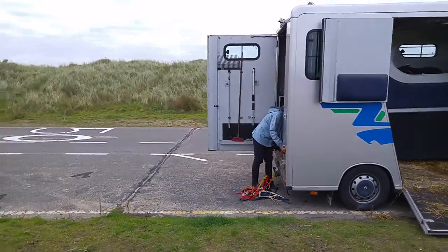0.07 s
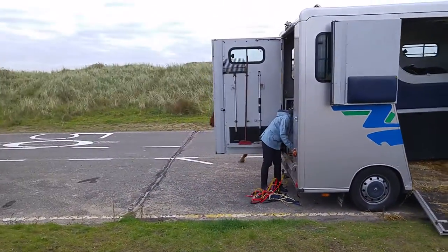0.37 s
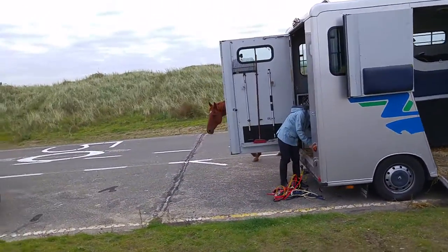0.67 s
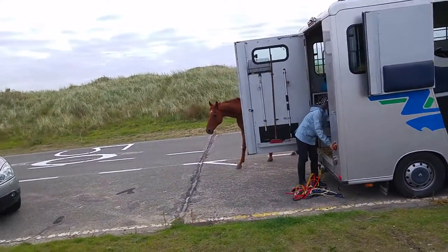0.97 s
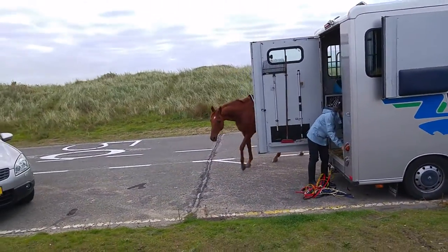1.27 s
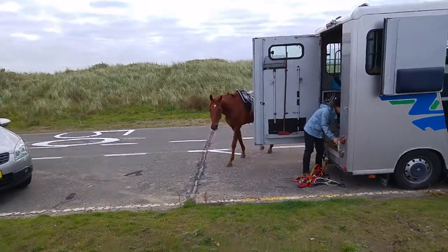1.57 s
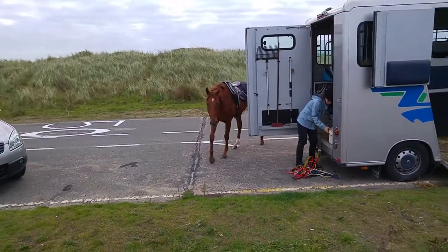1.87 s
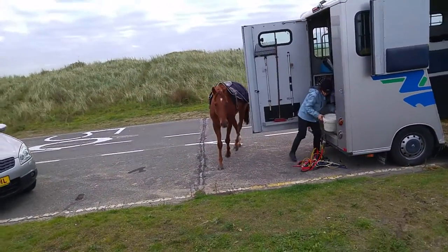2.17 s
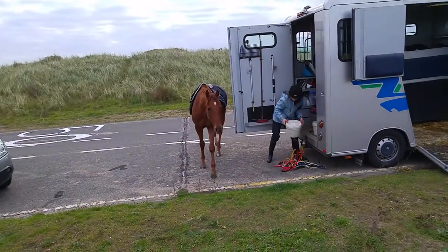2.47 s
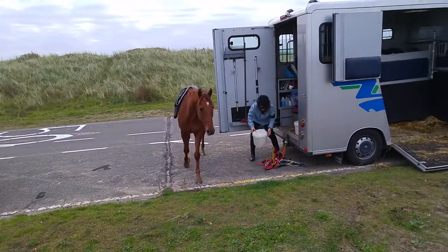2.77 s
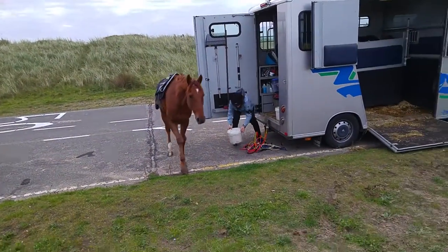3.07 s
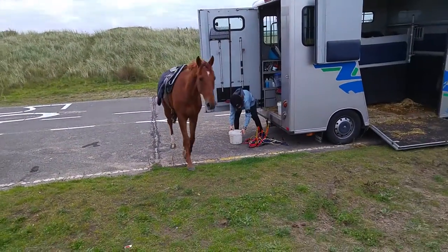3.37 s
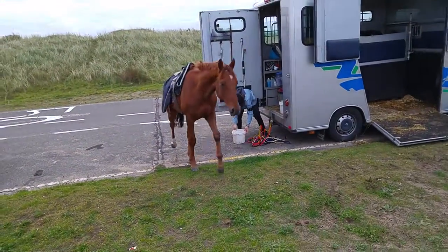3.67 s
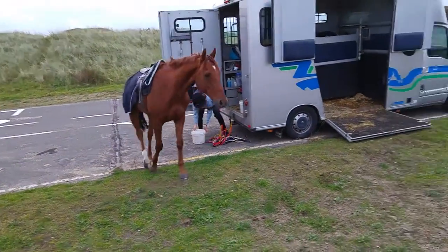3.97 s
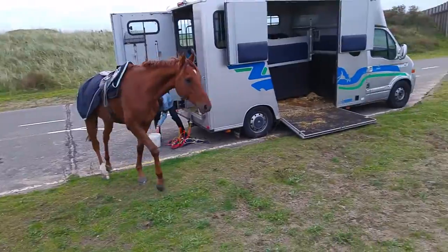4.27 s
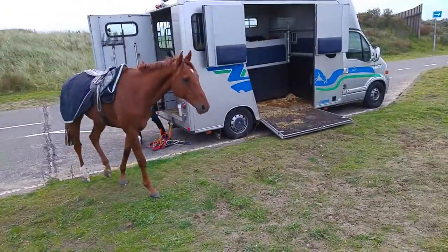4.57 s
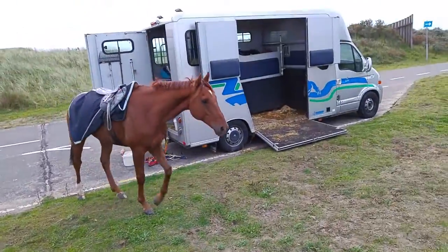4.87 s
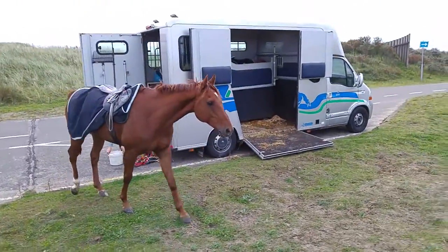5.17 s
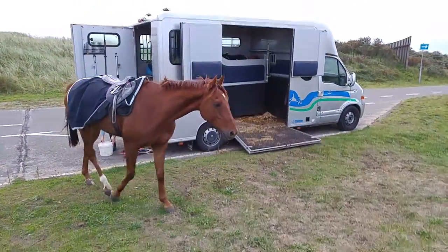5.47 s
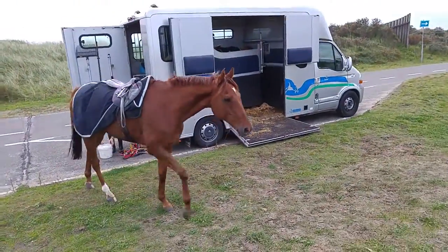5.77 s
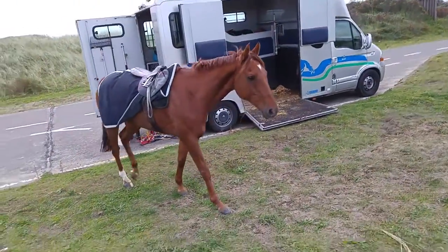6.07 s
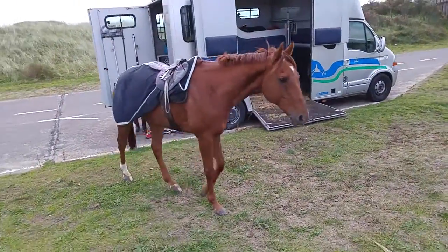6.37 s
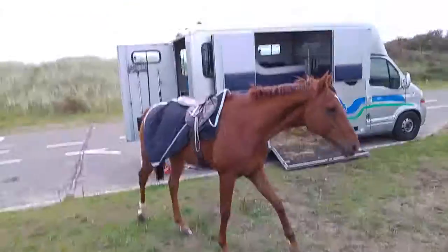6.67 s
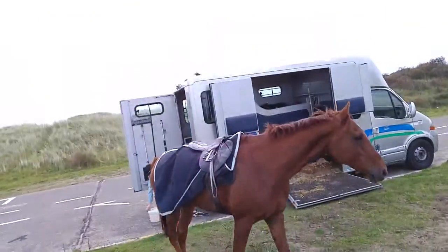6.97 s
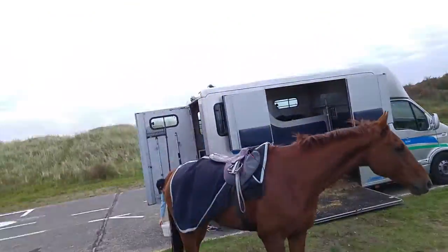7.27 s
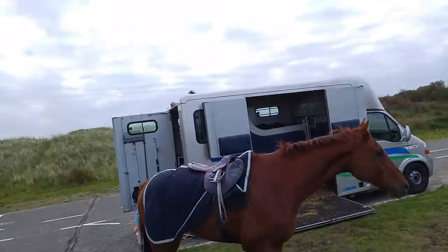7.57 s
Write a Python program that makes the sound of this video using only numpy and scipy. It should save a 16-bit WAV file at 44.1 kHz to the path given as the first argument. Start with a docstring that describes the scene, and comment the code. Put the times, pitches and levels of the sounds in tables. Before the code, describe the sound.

A horse walks on asphalt close by, outdoors, over a faint wash of distant air. From about 0.2 seconds its shod hooves land in uneven, hollow clops, often two or three quick knocks together, with gritty scuffs and a slight echo. They are strongest between 1 and 3 seconds, while light puffs of wind touch the microphone on the right. At about 3.4 seconds a plastic bucket is set down with a hollow thump. The clops stop near 3.7 seconds as the horse reaches grass, except for one sharp clinking step at 4.8. From 4 seconds loud gusts buffet the microphone with a sputtering rumble, mostly on the right, then shifting toward the left from about 6.5. The wind pops sharply at 5.6 and 6.6 seconds. Beneath it, faint swishes of dry grass and cloth and a few tiny snaps continue until the end, around 7.6 seconds.

```python
"""Horse passing in a gusty wind

A horse walks over asphalt, past a parked horse van and onto grass, close to a hand-held stereo mic.
Each hoof lands in a few quick knocks, scuffs the grit and echoes off the van; a bucket is set down.
Dry grass hisses over a distant wash of air, and gusts buffet first the right mic port, then the left."""
import sys
import numpy as np
from scipy import signal
from scipy.fft import rfft, irfft
from scipy.io import wavfile
from scipy.ndimage import uniform_filter1d

SR = 44100
rng = np.random.default_rng(int(sys.argv[2]) if len(sys.argv) > 2 else 0)


def output_pcm(signal):
    """Save a mono or channel-first signal as 16-bit PCM at the path in sys.argv[1].

    Samples are clipped to [-1, 1] before scaling.
    """
    pcm = np.clip(np.atleast_2d(signal).T, -1, 1) * 32767
    wavfile.write(sys.argv[1], SR, np.round(pcm).astype(np.int16))


N = 336483
TIME = np.arange(N) / SR

# spectrum of road grit under a shoe: (frequency [Hz], level [dB])
GRIT_SPECTRUM = [(400, 11), (2400, 1.5), (3500, -7.5), (7200, 9.5), (10000, -8.5), (16000, -12)]
# colour of wind striking a mic port: (frequency [Hz], gain [dB])
BUFFET_SPECTRUM = [(45, -2), (70, 5), (130, -2.5), (310, 0), (400, 3), (490, -21), (590, 5), (1000, -4.5),
                   (3000, -21)]


def hooves():
    """Hooves on asphalt, close by: the rim mostly cracks, the flat sole rings."""
    # contacts, one to four a footfall: (time [s], ring level [dB], sole pitch [Hz], crack level [dB])
    contacts = [(0.225, -32.5, 950, -43), (0.543, -26.5, 990, -34), (0.8193, -26, 970, -30.5),
                (0.826, -20.5, 1027, -40), (1.086, -26, 1385, -31), (1.091, -29, 760, -42),
                (1.1113, -13, 1030, -23), (1.2262, -23, 1013, -35.5), (1.367, -34, 780, -38.5),
                (1.376, -36, 1050, -33), (1.3947, -38, 1050, -43.5), (1.4124, -39, 1050, -31),
                (1.639, -24, 956, -41), (1.6748, -24, 958, -32.5), (1.827, -25.5, 1004, -36.5),
                (1.944, -33, 1010, -37), (1.9587, -18.5, 1012, -20.5), (2.077, -14, 1120, -21.5),
                (2.0836, -18, 1040, -30), (2.2006, -21.5, 750, -23.5), (2.2189, -21, 1010, -21.5),
                (2.236, -26.5, 1065, -34.5), (2.446, -24.5, 1120, -29.5), (2.4655, -22, 990, -33),
                (2.765, -17, 1014, -27.5), (2.773, -17.5, 1260, -25), (3.065, -23, 1017, -31),
                (3.072, -22, 1060, -21.5), (3.08, -15.5, 1027, -31), (3.4765, -21, 725, -31),
                (3.651, -29, 1196, -34.5), (3.661, -15, 930, -37.5), (4.8425, -13.5, 806, -31)]
    out = np.zeros((2, N))
    for start, ring_db, hz, crack_db in contacts:
        add(out, start, knock(ring_db, hz, crack_db))
    # a shoe caught on its edge rings one clear note
    add(out, 0.543, ring([(2605, -32, 0.027)], TIME[:SR // 10]))
    return out


def knock(ring_db, sole_hz, crack_db, close_s=0.00086, lag_samples=6):
    """A knock cracks on grit and rings the steel shoe; the hollow under the sole swells as it closes."""
    # modes of the hollow: (ratio to sole pitch, level [dB], t60 [s])
    sole_modes = [(0.86, -8, 0.036), (0.998, 2.5, 0.021), (1.017, -14.5, 0.06)]
    # modes of the shoe: (frequency [Hz], level relative to the crack [dB], t60 [s])
    shoe_modes = [(2286, -9, 0.024), (2627, -5.5, 0.02), (4250, -24.5, 0.06)]
    # spectrum of struck asphalt: (frequency [Hz], level [dB])
    road_spectrum = [(200, -9.5), (500, 2), (1200, 10.5), (1700, -0.5), (2500, 3), (3300, -10.5),
                     (4500, -6), (5500, -5.5), (7200, -1), (10000, -14.5), (16000, -25.5)]
    t = TIME[:4096]
    hollow = ring([(sole_hz * ratio, db, t60) for ratio, db, t60 in sole_modes], t)
    hollow *= 1 - np.exp(-t / close_s)
    # the shoe's modes scatter in pitch and level from knock to knock
    shoe = ring([(hz * (1 + 0.035 * rng.standard_normal()), db + 2 * rng.standard_normal(), t60)
                 for hz, db, t60 in shoe_modes], t)
    left = gain_of(ring_db) * hollow + gain_of(crack_db) * shoe
    # the horse is slightly to the left, so the right port hears it later
    right = np.interp(t - lag_samples / SR, t, left, left=0)
    # every spot of road has its own colour
    spot = [(hz, db + 2 * rng.standard_normal()) for hz, db in road_spectrum]
    grit = crack(spot, decay_s=0.0067, crumble_db=-22.5, crumble_s=0.012)
    return np.array([left, right]) + gain_of(crack_db) * grit


def crack(spectrum, decay_s, crumble_db, crumble_s, click_height=4.9, size=4096):
    """A click and a sharp burst, then a short crumble; the ports share mainly the lows of its noise."""
    t = TIME[:size]
    bins = rfft(rng.standard_normal((2, size)))
    shared = 1 / (1 + (np.fft.rfftfreq(size, 1 / SR) / 2800) ** 4)
    bins[1] = shared * bins[0] + np.sqrt(1 - shared ** 2) * bins[1]
    burst = irfft(bins, size)
    burst[:, 0] += click_height  # first contact
    # grains of grit give way one after another
    grains = unit_rms(gain_of(1.9 * unit_rms(uniform_filter1d(rng.standard_normal(size), size=90))))
    fade = np.exp(-(t / decay_s) ** 2) + gain_of(crumble_db) * np.exp(-t / crumble_s) * grains
    return unit_rms(coloured(burst * fade, spectrum)) * np.sqrt(np.mean(fade ** 2))


def scuffs():
    """Hooves drag grit, brush turf and slide with a thin hiss; tack and dry stalks snap."""
    # grainy scrapes: (time [s], length [s], level [dB], left minus right [dB])
    scrapes = [(1.445, 0.19, -52.5, -6), (1.732, 0.034, -44.5, 0), (1.777, 0.019, -44.5, 5),
               (2.173, 0.014, -40, -6), (2.493, 0.042, -46.5, -12.5), (2.845, 0.037, -37, 3.5),
               (3.412, 0.094, -46, -10), (3.709, 0.021, -37, -3.5), (6.468, 0.059, -42.5, 13)]
    # hissing slides: (time [s], length [s], level [dB], pitch [Hz])
    slides = [(0.094, 0.026, -50.5, 3070), (0.593, 0.18, -54.5, 7300), (2.243, 0.071, -48, 6800),
              (6.24, 0.23, -43, 7350)]
    # spectrum of a slide: (ratio to its pitch, level [dB])
    slide_spectrum = [(0.61, -8.5), (0.74, 0.5), (0.85, -4), (1, 6), (1.2, -23)]
    # small sharp snaps: (time [s], level [dB], left minus right [dB])
    snaps = [(0.5038, -38.5, -1), (4.1519, -38.5, -4), (4.331, -39.5, -6), (6.724, -37, -18.5)]
    # spectrum of a snap: (frequency [Hz], level [dB])
    snap_spectrum = [(300, 9), (3000, -3), (7000, 9.5), (15000, -7.5)]
    out = np.zeros((2, N))
    grit = noise(GRIT_SPECTRUM) * gain_of(4.8 * flutter(rate_hz=2900))
    for start, length, db, pan_db in scrapes:
        out += gain_of(db) * panned(pan_db) * grit * arch(start, length)
    for start, length, db, hz in slides:
        hiss = noise([(hz * ratio, level) for ratio, level in slide_spectrum])
        out += gain_of(db) * hiss * arch(start, length)
    for start, db, pan_db in snaps:
        snap = crack(snap_spectrum, decay_s=0.0017, crumble_db=0.5, crumble_s=0.0054)
        add(out, start, gain_of(db) * panned(pan_db) * snap)
    return out


def shoe_clinks():
    """A shoe grazes, then clips the edge of the road: a gritty snap with a very short ring."""
    # a light and a hard strike: (time [s], level [dB])
    strikes = [(4.8192, -49), (4.8427, -28.5)]
    # modes of the clipped steel: (frequency [Hz], level [dB], t60 [s])
    steel_modes = [(3750, 5.5, 0.016), (4290, 2, 0.015)]
    out = np.zeros((2, N))
    for start, db in strikes:
        snap = crack(GRIT_SPECTRUM, decay_s=0.0016, crumble_db=-21, crumble_s=0.008)
        add(out, start, gain_of(db) * (snap + ring(steel_modes, TIME[:snap.shape[1]])))
    return out


def bucket(rise_s=0.0037):
    """A plastic bucket rocks onto its base with a hollow thump."""
    # the base touches down: (time [s], level [dB])
    hits = [(3.432, -23.5), (3.444, -17), (3.46, -19.5)]
    # modes of the bucket: (frequency [Hz], level [dB], t60 [s])
    modes = [(163, 1, 0.13), (292.6, 6, 0.14), (353, -5, 0.049), (462, -3.5, 0.11), (600, 9.5, 0.011)]
    out, t = np.zeros((2, N)), TIME[:12000]
    thump = ring(modes, t) * (1 - np.exp(-t / rise_s))
    for start, db in hits:
        add(out, start, gain_of(db) * thump)
    return out


def echoes(direct, size=12000):
    """The road and the van's side return a few early taps, then a thin outdoor tail."""
    # decay of the tail: (frequency [Hz], t60 [s])
    tail_t60 = [(300, 0.66), (1000, 0.3), (2500, 0.16), (7000, 0.047), (15000, 0.033)]
    t = TIME[:size]
    # sparse reflections: 2500 a second in the tail, 900 in the early part
    taps = rng.standard_normal((2, size)) * (rng.random((2, size)) < 2500 / SR) * (t > 0.004)
    hz, frame_s, bins = signal.stft(taps, SR, nperseg=256)
    decay = np.exp(-np.log(1000) * frame_s / curve_at(tail_t60, hz)[:, None])
    tail = signal.istft(bins * decay, SR, nperseg=256)[1][:, :size]
    early = rng.standard_normal((2, size)) * (rng.random(size) < 900 / SR) * (t > 0.002)
    early *= np.exp(-t / 0.017)
    response = (gain_of(-29.0) * unit_rms(tail) + gain_of(-6.5) * unit_rms(early)) / np.sqrt(size)
    return signal.fftconvolve(direct, response, axes=1)[:, :N]


def port_colour(sound):
    """The two mic ports colour nearby sounds in opposite ways."""
    # tilt between the ports: (frequency [Hz], gain added left and taken right [dB])
    tilt = [(200, -3), (850, 2.5), (1500, 0.5), (2400, -5), (3500, -3), (7000, 4.5), (12000, 1.5)]
    return np.array([coloured(sound[0], tilt), coloured(sound[1], [(hz, -db) for hz, db in tilt])])


def wind(port_limit=1.05):
    """Wind right on the mic: near its pressure limit a port saturates and crackles."""
    db, octaves = wind_pressure()
    left = port_buffeting(db[0], octaves[0], corner_hz=905)
    right = port_buffeting(db[1], octaves[1], corner_hz=557)
    return port_limit * np.tanh((np.array([left, right]) + thumps_and_pops()) / port_limit)


def wind_pressure(rise_s=0.012, fall_s=0.025):
    """Gusts rise, hold and fall over the breeze; gives each port's level [dB] and band shift [octaves]."""
    # breeze between gusts: (time [s], left level [dB], right level [dB])
    breeze = [(0, -52, -42), (.45, -61, -40), (.95, -73, -57), (1.6, -53, -47.5), (2.35, -60, -50),
              (3.1, -66, -39.5), (3.85, -49, -42.5), (4.5, -39, -33.5), (6.348, -32.5, -31),
              (7.2, -34, -43), (7.63, -24, -31.5)]
    # gusts: (time [s], hold [s], windward level [dB], left minus right [dB], band shift [octaves])
    gusts = [(0.121, 0.042, -33, -35, -0.65), (2.554, 0.029, -30, -32, -1.54),
             (2.976, 0.034, -27.5, -11, -0.44), (3.13, 0.032, -26, -24, -1.24),
             (4.117, 0.18, -17.5, -25, -0.58), (4.568, 0.35, -17.5, -22, -0.15),
             (4.801, 0.025, -17, -18, -0.023), (4.979, 0.034, -12.5, -34, -0.19),
             (5.095, 0.094, -14.5, -16, 0.021), (5.237, 0.042, -12.5, -28, 0.29),
             (5.337, 0.012, -14, -33, 0.06), (5.441, 0.0067, -15.5, -29, -0.56),
             (5.508, 0.0033, -23, 27, -0.27), (5.641, 0.011, -10, -23, 0.29), (5.703, 0.21, -19, -30, 0.25),
             (5.88, 0.024, -19, -24, 0.46), (5.955, 0.083, -13, -36, -0.0054),
             (6.101, 0.087, -15.5, -34, -0.42), (6.217, 0.036, -14, -34, -0.043),
             (6.411, 0.032, -16.5, -8.5, -0.33), (6.498, 0.068, -15, 2, 0.011),
             (6.564, 0.24, -15.5, 11.5, 0.22), (6.836, 0.24, -19, -8.5, -0.06),
             (6.888, 0.013, -15, -3, 0.5), (7.153, 0.0036, -14.5, -8.5, -0.65),
             (7.32, 0.092, -13, 25, -0.5), (7.374, 0.035, -14.5, 32, 0.33), (7.468, 0.02, -17.5, -1, -0.4)]
    times, *port_levels = np.transpose(breeze)
    power = gain_of([np.interp(TIME, times, db) for db in port_levels]) ** 2
    weighted_shift = np.zeros((2, N))
    for start, hold, db, pan_db, octaves in gusts:
        before, after = np.maximum(start - TIME, 0), np.maximum(TIME - start - hold, 0)
        swell = np.exp(-before / rise_s - after / fall_s)
        gust_power = (gain_of(db) * windward(pan_db) * swell) ** 2
        power += gust_power
        weighted_shift += octaves * gust_power
    return 10 * np.log10(power), weighted_shift / power


def port_buffeting(pressure_db, octaves, corner_hz, size=1024):
    """Eddies buffet one port; the stronger the gust, the smaller the eddies and the higher their band."""
    hz, frame_s, bins = signal.stft(rng.standard_normal(N), SR, nperseg=size, noverlap=size * 3 // 4)
    # the stream sputters within each gust: surges are capped, lulls go deeper
    sputter_db = 3.5 * np.minimum(flutter(rate_hz=50, slowest_hz=12)[0], 1.2)
    band_hz = corner_hz * 2 ** (octaves + (pressure_db + sputter_db + 13.0) / 16)
    ratio = hz[:, None] / np.interp(frame_s, TIME, band_hz)
    band = (ratio / np.hypot(ratio, 0.18)) ** 2.65 / (1 + ratio ** 2.224) ** 1.927
    shape = gain_of(curve_at(BUFFET_SPECTRUM, hz))[:, None] * band
    shape /= np.linalg.norm(shape, axis=0)
    eddies = signal.istft(bins * shape, SR, nperseg=size, noverlap=size * 3 // 4)[1][:N]
    # even out the noise, so that pressure and sputter set the slow level
    eddies /= np.sqrt(uniform_filter1d(uniform_filter1d(eddies ** 2, size=1800), size=1800) + 1e-12)
    return eddies * gain_of(pressure_db + 0.75 * sputter_db)


def thumps_and_pops():
    """Low wind thumps, and two sharp pops as the wind overloads the mic, each mostly on one port."""
    # pulses: (time [s], level before colouring [dB], frequency [Hz], left minus right [dB])
    pulses = [(0.304, -16.5, 77, -44), (0.392, -19.5, 109, -30), (0.443, -27, 142, -23),
              (3.62, -17, 106, -33), (5.649, 3.5, 1200, -33), (6.596, 6, 1330, 41), (7.004, -2.5, 79, -26)]
    out = np.zeros((2, N))
    for centre, db, hz, pan_db in pulses:
        phase = 2 * np.pi * hz * (TIME - centre)
        out += gain_of(db) * windward(pan_db) * (1 - phase ** 2) * np.exp(-phase ** 2 / 2)
    return coloured(out, BUFFET_SPECTRUM)


def rustle(road_db=-57.5, grass_db=-52):
    """Grass and cloth rustle louder as the horse nears and swell as it strides; close swishes fizz."""
    # swishes of legs and rug: (time [s], length [s], level [dB])
    swishes = [(1.945, 0.46, -48), (3.095, 0.32, -45), (4.545, 0.19, -51.5), (5.517, 0.3, -45),
               (5.968, 0.59, -48), (6.74, 0.063, -40), (7, 0.64, -48)]
    # spectrum of dry grass: (frequency [Hz], level [dB])
    grass_spectrum = [(300, -10), (2400, 0), (3400, -1), (5500, 4), (7250, 9.5), (7800, 2.5), (8400, 4.5),
                      (10500, -6.5), (15500, -5)]
    # fine fizz close to the mic: (time [s], length [s], level [dB])
    fizzes = [(3.15, 0.33, -59), (6.652, 0.18, -46), (7.074, 0.5, -47.5)]
    # spectrum of the fizz: (frequency [Hz], level [dB])
    fizz_spectrum = [(5000, -25), (14500, 0)]
    steady = gain_of(np.linspace(road_db, grass_db, N))
    fizz = noise(fizz_spectrum) * swells(fizzes)
    grass = patchy(noise(grass_spectrum), patch_db=3.0) * np.hypot(steady, swells(swishes))
    return (grass + fizz) * gain_of(1.4 * flutter(rate_hz=360))


def distant_air():
    """A faint open-air wash from far off, its level drifting slowly."""
    # spectrum of the wash: (frequency [Hz], level [dB])
    air_spectrum = [(30, -10), (70, -2), (250, 5.5), (480, 1.5), (650, 10.5), (950, 4.5), (1500, -8.5),
                    (3000, -11.5), (7000, -46)]
    return gain_of(-50.5) * patchy(noise(air_spectrum), patch_db=3.5) * gain_of(flutter(rate_hz=0.67))


def gain_of(db):
    """Decibels to amplitude."""
    return 10 ** (np.asarray(db) / 20)


def unit_rms(x):
    """Scales each channel to rms 1."""
    return x / np.sqrt(np.mean(x ** 2, axis=-1, keepdims=True) + 1e-20)


def curve_at(points, hz):
    """Interpolates rows (frequency [Hz], value) on a log-frequency axis."""
    frequencies, values = np.transpose(points)
    return np.interp(np.log(hz + 1), np.log(frequencies), values)


def add(mix, start_s, sound):
    """Mixes a sound in from start_s on."""
    part = mix[:, round(start_s * SR):][:, :sound.shape[-1]]
    part += sound[..., :part.shape[-1]]


def panned(db):
    """Left and right gains for a level difference."""
    return gain_of([[db / 2], [-db / 2]])


def windward(db):
    """Panning gains with the louder port at 1."""
    return panned(db) / panned(db).max()


def coloured(x, spectrum, size=2048):
    """Minimum-phase filter with the given spectrum."""
    log_gain = np.log(gain_of(curve_at(spectrum, abs(np.fft.fftfreq(size, 1 / SR)))))
    taps = np.fft.ifft(np.exp(np.conj(signal.hilbert(log_gain)))).real
    taps = taps.reshape((1,) * (x.ndim - 1) + (-1,))
    return signal.fftconvolve(x, taps, axes=-1)[..., :x.shape[-1]]


def noise(spectrum):
    """Coloured noise, unrelated in the two ports."""
    return unit_rms(coloured(rng.standard_normal((2, N)), spectrum))


def flutter(rate_hz, slowest_hz=0):
    """A smooth random wander for each port, between two rates."""
    hz = np.fft.rfftfreq(N, 1 / SR)
    band = np.exp(-(hz / rate_hz) ** 2) * (hz >= slowest_hz)
    return unit_rms(irfft(rfft(rng.standard_normal((2, N))) * band, N))


def patchy(x, patch_db, size=512):
    """Passing patches of colour, a few hundred hertz wide and some hundredths of a second long."""
    bins = signal.stft(x, SR, nperseg=size)[2]
    field = uniform_filter1d(rng.standard_normal(bins.shape[1:]), size=5, axis=0)
    field = uniform_filter1d(field, size=7, axis=1)
    bins *= gain_of(patch_db * field / field.std())
    return unit_rms(signal.istft(bins, SR, nperseg=size)[1][:, :N])


def ring(modes, t):
    """Decaying sines from rows (frequency [Hz], level [dB], t60 [s])."""
    return sum(gain_of(db) * np.exp(-np.log(1000) * t / t60) * np.sin(2 * np.pi * hz * t)
               for hz, db, t60 in modes)


def arch(start_s, length_s):
    """A rounded swell from silence to 1 and back."""
    progress = np.clip((TIME - start_s) / length_s, 0, 1)
    return np.sqrt(4 * progress * (1 - progress))


def swells(rows):
    """A sum of arches from rows (time [s], length [s], level [dB])."""
    return sum(gain_of(db) * arch(start, length) for start, length, db in rows)


def scene():
    """Horse and bucket near the mic with their echoes, wind on the ports, air and rustle behind."""
    near = hooves() + scuffs() + bucket() + shoe_clinks()
    return port_colour(near + echoes(near)) + wind() + distant_air() + rustle()


def record(dry):
    """The microphone's bass cut at 45 Hz, then the band limit at 16.3 kHz."""
    bass_cut = signal.butter(4, 45, "highpass", fs=SR, output="sos")
    band_limit = signal.firwin(511, 16300, window=("kaiser", 9), fs=SR)
    return signal.oaconvolve(signal.sosfilt(bass_cut, dry), band_limit[None], "same")


dry = scene()
out = record(dry)
output_pcm(out)
```